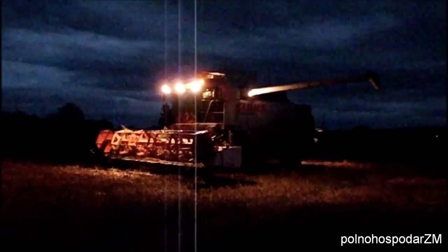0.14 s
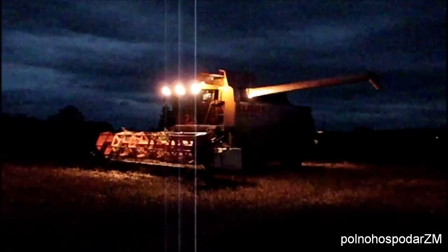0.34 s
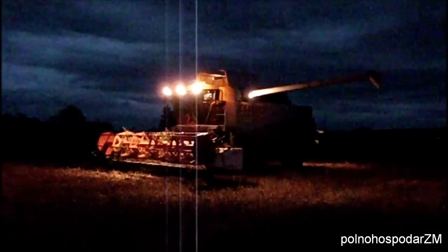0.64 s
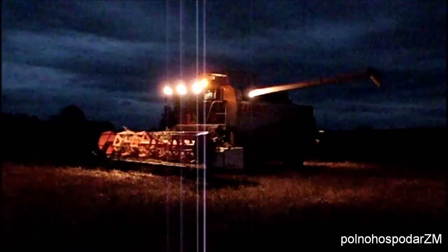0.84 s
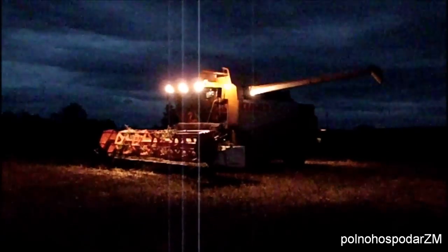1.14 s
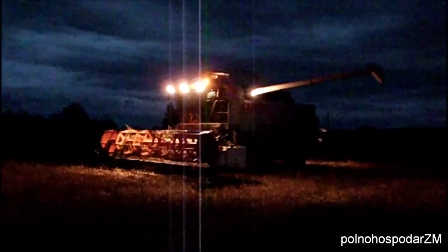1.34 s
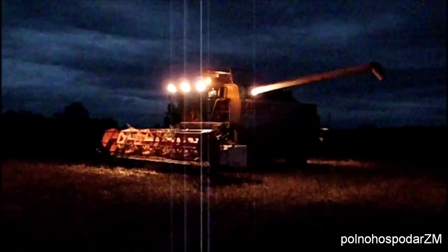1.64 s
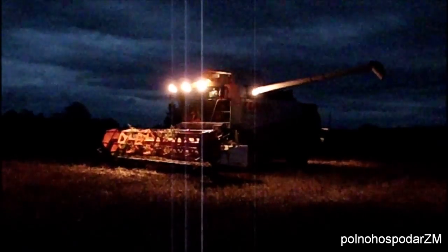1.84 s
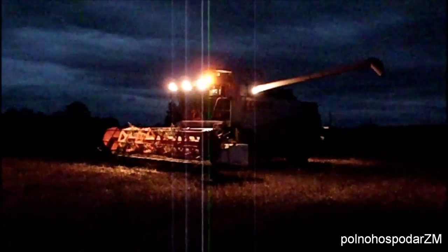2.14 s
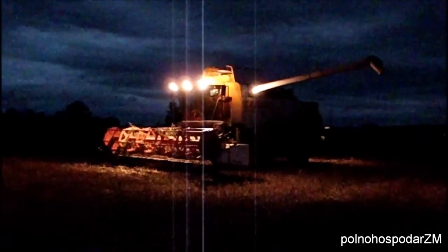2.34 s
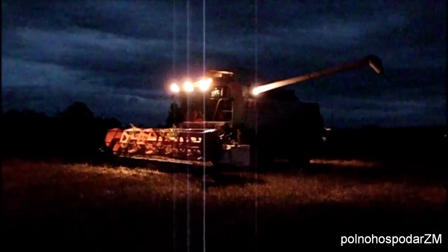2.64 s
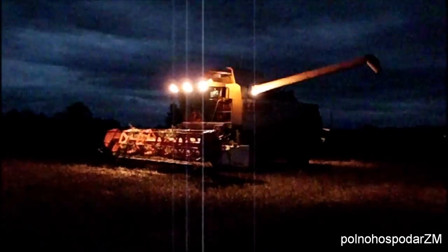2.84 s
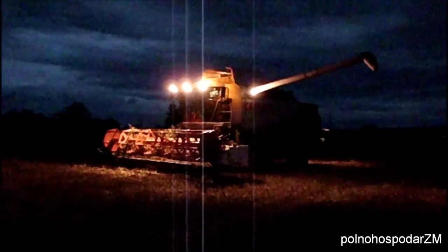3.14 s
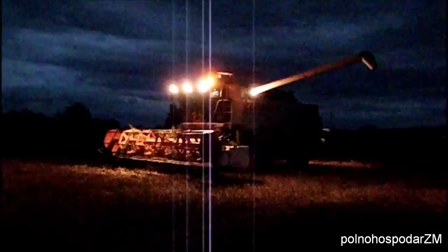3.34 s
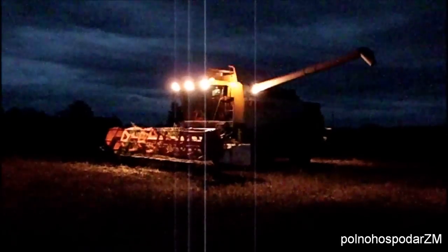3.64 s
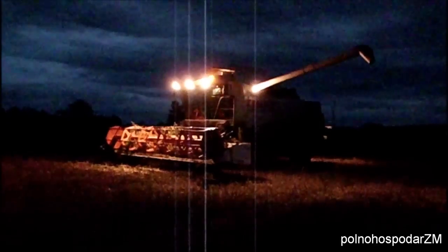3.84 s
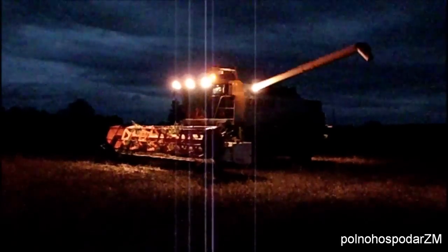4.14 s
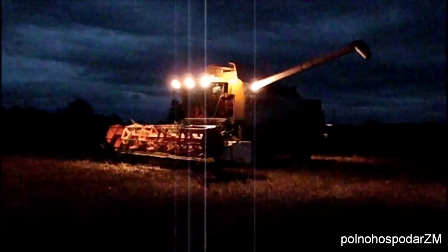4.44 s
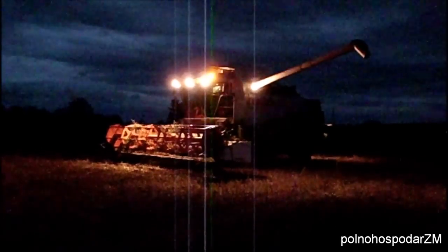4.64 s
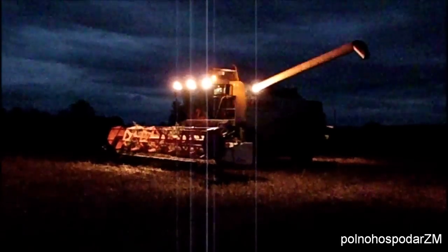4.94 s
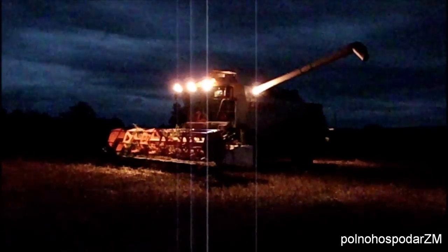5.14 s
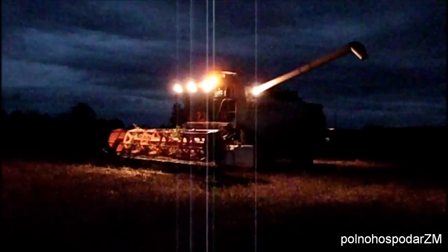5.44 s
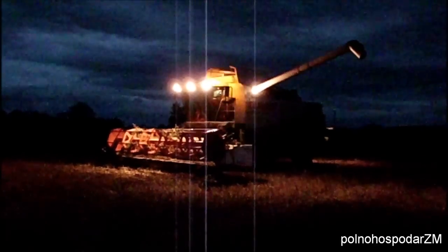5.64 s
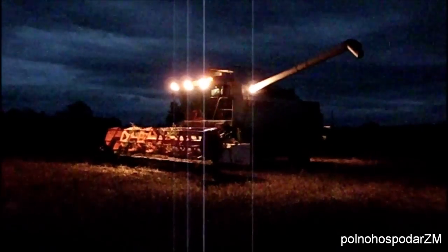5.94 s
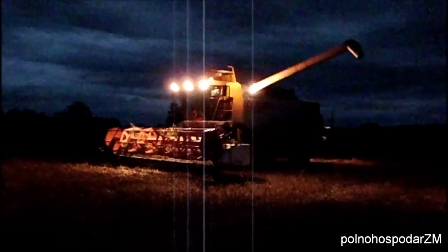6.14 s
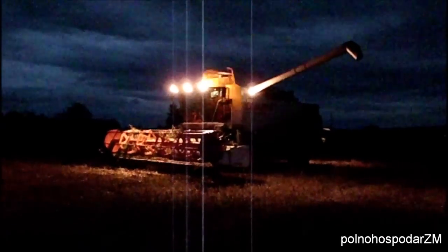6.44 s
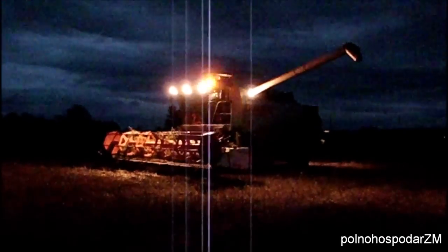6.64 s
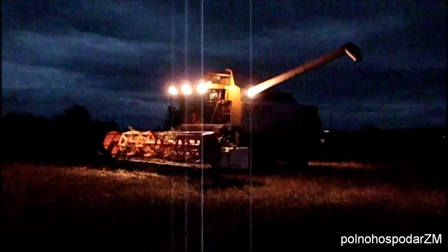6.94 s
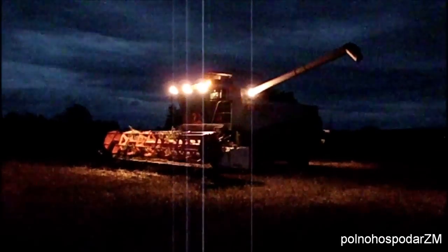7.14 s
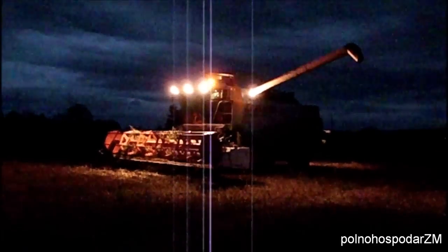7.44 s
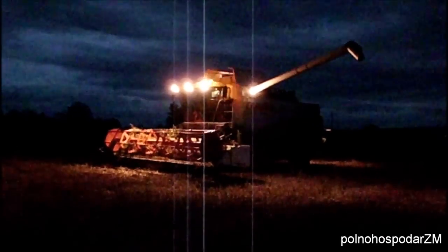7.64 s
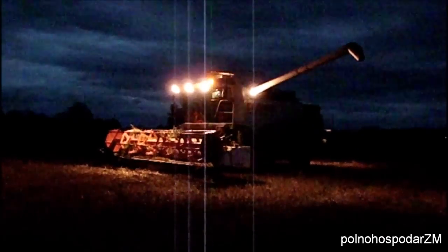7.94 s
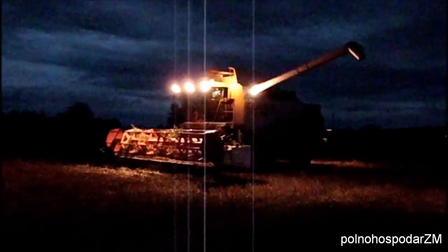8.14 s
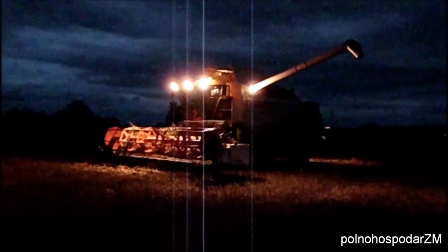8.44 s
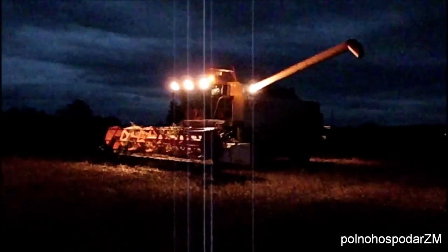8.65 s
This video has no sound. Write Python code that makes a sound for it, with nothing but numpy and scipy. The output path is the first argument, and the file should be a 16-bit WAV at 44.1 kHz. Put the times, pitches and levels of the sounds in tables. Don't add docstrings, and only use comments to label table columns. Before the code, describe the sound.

Across an open field at dusk, a combine harvester idles steadily some way off: low diesel hum, metallic ringing, wavering hydraulic whine, thin turbo whistle and a broad fan and exhaust rush. Slow wind rumbles come first, then after four seconds gusts rip and slap the small unshielded microphone, hardest near six. A tiny dry stalk snap comes near eight seconds, then a last gust.

```python
import sys
import numpy as np
from scipy import signal
from scipy.fft import rfft, irfft, next_fast_len
from scipy.io import wavfile
from scipy.ndimage import uniform_filter1d, map_coordinates

SR = 44100
rng = np.random.default_rng(int(sys.argv[2]) if len(sys.argv) > 2 else 0)


def ratio(d):
    e = np.asarray(d, float) / 20
    return 10 ** e


def int16_out(signal):
    q = np.round(np.clip(np.atleast_2d(signal).T, -1, 1) * 32767)
    wavfile.write(sys.argv[1], SR, q.astype(np.int16))


N = 387198
STEPS = np.arange(0, N + 64, 64)

# (time [s], speed [cycles/s])
ENGINE_SPEED = [(0, 9.989), (3, 9.989), (3.5, 9.992), (5.8, 9.992), (6.6, 9.998), (8.78, 9.998)]
ENGINE_ORDERS = [6, 58, 62, 63, 64, 65, 99, 102, 105, 108, 111, 116, 120, 123, 136, 138, 141, 200, 283]
ENGINE_ORDER_LEVELS = [-39.5, -64, -70, -70, -66.5, -70, -63.5, -70.5, -73, -67.5, -68.5, -65.5, -75, -70,
                       -68.5, -80, -66.5, -62.5, -75.5]
# (frequency [Hz], level [dB per Hz])
BLOCK_RING = [(500, -42), (850, -4.5), (1100, -3), (1400, -2.5), (1700, -2.5), (2500, -2.5), (3000, -11),
              (3600, -3), (4200, -12), (5000, -37)]
# (time [s], level [dB rms])
LOOSE_PANEL = [(0, -67), (.66, -66.5), (1.65, -59), (2.6, -59.5), (3, -63), (3.6, -59.5), (5.6, -63),
               (6.6, -56.5), (8.78, -57)]
# (frequency [Hz], level [dB per Hz])
PANEL_RATTLE = [(940, -28), (1010, -3), (1045, -4), (1090, -2), (1160, -32)]

# (time [s], whine level [dB rms], lean [dB])
PUMP_LOAD = [(0, -49.5, 1), (.4, -50, 2.5), (.99, -52, -4.5), (1.65, -51, -2), (1.98, -57, -8),
             (2.64, -53.5, -2), (2.97, -50, -1), (3.3, -51, 0), (3.7, -47.5, -1.5), (4.1, -47.5, 1),
             (4.29, -55, 7), (4.95, -53, 5.5), (5.3, -51.5, 2), (5.7, -51, 5), (6.27, -51.5, 1.5),
             (6.6, -56.5, -7), (7.26, -57, -2), (8.6, -53, 2)]
# (harmonic number, level over the whine [dB], share of load swing followed,
# share of lean followed, own drift [dB])
PUMP_STRONG_TONES = [(10, 0, 0.98, 0, .3), (11, -5, 1, 0.99, .6), (9, -3.5, .2, .15, 1.2),
                     (8, -7, .1, -.1, 1.7), (13, -9.5, .3, -0.3, 1.5), (14, -9, .5, .2, 2)]
# (harmonic number, level [dB rms])
PUMP_WEAK_TONES = [(2, -65), (3, -65.5), (4, -67), (6, -66.5), (12, -63.5), (15, -71)]

# (time [s], pitch [Hz], level [dB rms])
TURBO_WHISTLE = [(0.0, 4280, -60), (0.07, 4271, -62), (1.64, 4290, -64), (1.71, 4240, -70),
                 (3.59, 4272, -63.5), (5.55, 4270, -63), (6.02, 4280, -56.5), (6.26, 4260, -70),
                 (8.78, 4277, -58.5)]
# (pitch [Hz], level [dB])
ALTERNATOR = [(7975, -78), (9040, -80), (9570, -83)]

# (time [s], level [dB], brightness [dB])
RUSH_CARRIED = [(0, -48.5, 1), (.9, -49.5, .5), (1.6, -49.5, -.5), (2, -51, .5), (2.6, -50.5, 1),
                (2.96, -48, -1.5), (3.2, -50, .5), (3.45, -47, 0), (4.18, -48, -.5), (4.7, -48.5, -.5),
                (5.2, -46, 0), (5.7, -48, 0), (6.28, -48, -.5), (6.68, -50.5, .5), (7.1, -50, 0),
                (7.8, -50.5, .5), (8.4, -48.5, .5), (8.78, -50.5, 1)]
# (time [s], change [dB], half width [s])
AIR_POCKETS = [(.32, 1.5, 0.19), (2.17, -2.5, .1), (2.35, 1.5, .08), (2.59, -2.5, .12), (3.06, 0.5, .04),
               (3.15, -3, .05), (3.23, 2, .05), (3.79, 3, .06), (4.45, 1.5, .1), (4.7, -1, .05),
               (5.01, 3, 0.12), (5.31, 2.5, .05), (5.43, -1, .06), (5.57, 1, .06), (6.21, -1.5, .05),
               (6.89, 1.5, .1), (7.24, 1.5, .1), (7.58, -2.5, .06), (7.85, -2.5, .05), (8.05, 1, .06),
               (8.21, -2.5, .06), (8.31, 2, .08)]
# (frequency [Hz], level [dB per Hz])
RUSH_GROWL = [(150, -22), (300, 0), (640, 0), (780, -5), (900, -2.5), (1040, -1.5), (1200, -3.5),
              (1600, -5.5), (2200, -37)]
RUSH_BODY = [(1100, -19), (1700, -4), (2300, -2.5), (3200, -3), (4200, -2), (4800, -8.5), (5600, -20.5)]
RUSH_HISS = [(4000, -14), (5200, -7), (6300, 0), (7200, -1.5), (8200, 0.5), (9000, -4.5), (10000, -11),
             (12000, -20), (14200, -25.5), (14500, -30)]

# (frequency [Hz], level [dB per Hz])
WIND_RUMBLE = [(2, -10), (12, 1), (30, -1), (60, -7.5), (90, -19.5), (150, -46)]
WIND_BUFFET = [(35, -37), (70, 0), (120, -0.5), (180, -6), (300, -38.5)]
WIND_FLUTTER = [(100, -28), (180, 1), (280, -2), (400, -16.5), (600, -61)]
WIND_RIP = [(250, -6), (400, 2.5), (600, -3), (900, -12), (1500, -25.5), (2500, -50)]
# (time [s], strength [dB])
STEADY_BREEZE = [(0, -38.5), (.5, -41.5), (1.4, -43.5), (1.75, -42), (2.2, -37.5), (2.6, -39), (3.1, -41),
                 (3.6, -36), (4.25, -39.5), (4.8, -37), (5.5, -32), (5.75, -31.5), (5.9, -38),
                 (6.25, -30.5), (6.7, -36), (7, -42), (8.15, -40), (8.5, -45.5)]
# (size [octaves above the largest], level over breeze [dB], growth relative to breeze)
EDDY_SIZES = [
    (0, 8, 0.89),
    (2, .5, 1),
    (3, -6, 1.1),
    (4, -17, 0.75),
]
# (time [s], peak [dB], time to fall 10 dB [s], eddy size [octaves above the largest])
WIND_HEAVES = [(.66, -27, .1, 0.71), (.78, -21.5, 0.08, .3), (.89, -24.5, .04, .8),
               (1.05, -36.5, .06, 2.16), (1.76, -21.5, 0.03, .4), (2.98, -24.5, 0.02, .8),
               (3.22, -24, .08, .5), (3.55, -24.5, .15, 0.89), (3.99, -19.5, 0.1, 1.1),
               (4.43, -24.5, .1, 1.1), (4.6, -23, .05, 1), (4.8, -23, 0.16, .5), (4.96, -22, 0.1, .2),
               (5.62, -20.5, .05, 1.7), (5.43, -16.5, .07, .3), (5.79, -23, 0.02, 1.6),
               (5.97, -23, .05, .2), (6.07, -22, 0.1, 1.2), (6.16, -18.5, 0.03, 1.4), (6.36, -20, 0.1, 1),
               (6.58, -22, 0.2, 1), (6.89, -23.5, .1, .6), (7.13, -19.5, .1, 1), (7.51, -26, 0.07, 0.75),
               (8.25, -23.5, .06, .4), (8.36, -24.5, 0.04, 0.89), (8.64, -17, .065, 0.77)]
# (time [s], peak [dB], time to fall 10 dB [s], eddy size [octaves above the largest])
WIND_GUSTS = [(0, -37, 0.2, 2.66), (1.88, -30, 0.08, 1.9), (2.17, -29, 0.17, 2.27),
              (2.68, -32.5, 0.1, 2.26), (3.3, -38, .12, 2.95), (3.45, -38, .08, 2.9),
              (3.74, -26, .07, 2.15), (4.2, -28, 0, 2.6), (4.6, -25, 0.02, 1.8), (4.65, -25.5, 0.0329, 3.9),
              (4.72, -33, .08, 2.9), (5.06, -27, .05, 2.7), (5.22, -30, 0.06, 2.8), (5.36, -32, .07, 3),
              (5.52, -30, .06, 3.1), (5.62, -23.5, 0.05, 3.9), (5.75, -27.5, 0.06, 3.13),
              (6.08, -24, .04, 2.8), (6.15, -27, 0.03, 3.83), (6.35, -24, 0.054, 3.1),
              (6.44, -26, 0.08, 2.24), (6.7, -35, .025, 3.3), (6.79, -29, 0.04, 3.34),
              (7.12, -28, 0.03, 4.05), (7.24, -32.5, 0.06, 2.54), (8.05, -36.5, 0.14, 2.15),
              (8.68, -28.5, .03, 2.3), (8.78, -26.5, .03, 2.8)]
# (time [s], peak pressure, half width [ms])
EDDY_SLAPS = [(4.2006, -0.35, 1.05), (4.628, 0.13, 0.39), (4.637, -.22, .55), (4.641, -0.22, .86),
              (4.6507, -0.32, 1.1), (4.66, 0.28, .6), (5.588, -.31, .59), (5.611, .2, .45),
              (5.632, .48, 1.9), (5.6352, -.19, .24), (5.6428, .2, .55), (5.749, .14, .3),
              (6.138, 0.21, .91), (6.145, -0.22, .9), (6.155, .37, 1.2), (6.3296, -.26, .8),
              (6.3461, 0.28, .55), (6.347, -0.35, .65), (6.3566, -.44, 1.7), (6.359, -0.21, 0.23),
              (6.3617, .22, .54), (6.448, -0.31, 0.96), (6.783, -.16, 1.8), (6.792, .23, 1.3),
              (7.0914, 0.25, .6), (7.1127, 0.38, 0.34), (7.115, -0.15, 0.56), (7.118, -0.38, 0.4),
              (8.7596, -.22, 1.4), (8.766, 0.2, 0.74)]
# (time [s], peak [dB])
STALK_SNAPS = [
    (7.9535, -41.5),
    (7.9573, -29),
]


def engine(cycles):
    tones = sum(tone(order * cycles, db, 1.3) for order, db in zip(ENGINE_ORDERS, ENGINE_ORDER_LEVELS))
    panel_db = curves(LOOSE_PANEL)[0]
    panel_hum = tone(104 * cycles, panel_db + 1, 0.6)
    panel_rattle = ratio(panel_db - 4 + 1.5 * wobble(30)) * noise(PANEL_RATTLE, 1.2)
    size = SR // 10
    repeated = np.tile(rng.standard_normal(size), 4)
    clatter = coloured(repeated, BLOCK_RING)[size:2 * size]
    ring = map_coordinates(clatter, [cycles % 1 * size], mode="grid-wrap")
    return tones + panel_hum + panel_rattle + ratio(-53 + 0.95 * wobble(3.01)) * ring


def pump(cycles):
    turn = 217.5 / 9.992 * cycles
    whine_db, lean_db = curves(PUMP_LOAD)
    mean_db = whine_db.mean()
    load_swing_db = whine_db - mean_db
    strong = 0
    for harmonic, db, follows, leans, drift_db in PUMP_STRONG_TONES:
        level_db = mean_db + db + follows * load_swing_db + leans * lean_db
        level_db = level_db + drift_db * wobble(2.505)
        strong = strong + tone(harmonic * turn, level_db, 1.3, scatter=0.24)
    weak = sum(tone(harmonic * turn, db, 2.6) for harmonic, db in PUMP_WEAK_TONES)
    return strong + weak


def whistles():
    hz, db = curves(TURBO_WHISTLE)
    turbo_cycles = np.cumsum(hz + 4 * wobble(12)) / SR
    turbo = tone(turbo_cycles, db, 2.4)
    alternator = sum(tone(pitch * np.arange(N) / SR, level, 2.5) for pitch, level in ALTERNATOR)
    return turbo + alternator


def rush(cycles):
    carried_db, bright_db = curves(RUSH_CARRIED)
    pockets = sum(db * np.exp(-((STEPS / SR - s) / width) ** 2) for s, db, width in AIR_POCKETS)
    pocket_db = spread(pockets)
    hiss_share = 0.43
    carried_db = carried_db + (1 - hiss_share) * pocket_db
    mean_db = carried_db.mean()
    growl_db = mean_db - 0.5 + 0.9 * (carried_db - mean_db) - bright_db
    body_db = carried_db + 1
    hiss_db = carried_db - 1.5 + bright_db + hiss_share * pocket_db
    firing = 2 * np.pi * 6 * cycles
    throb_db = 0.4 * np.cos(firing) + 0.25 * np.cos(2 * firing) + 0.25 * np.cos(firing / 2)
    growl = ratio(growl_db + 0.37 * wobble(20)) * noise(RUSH_GROWL, 1.06)
    body = ratio(body_db + throb_db + 0.65 * wobble(9)) * noise(RUSH_BODY, 0.93)
    hiss = ratio(hiss_db + throb_db / 2 + 0.57 * wobble(12)) * noise(RUSH_HISS, 0.72)
    return growl + body + hiss


def wind():
    rumble_db, buffet_db, flutter_db, rip_db = eddy_levels()
    lump, jab = wobble(25), wobble(70)
    fierce = np.clip((rip_db + 54) / 16, 0.3, 1)
    rumble = unit(ratio(1.44 * wobble(12) + 0.77 * lump) * noise(WIND_RUMBLE, 0.95))
    buffet = unit(ratio(1.5 * lump) * noise(WIND_BUFFET, 0.97))
    flutter = unit(ratio(fierce * (2.5 * lump + 1.7 * jab)) * noise(WIND_FLUTTER, 0.98))
    rip = unit(ratio(fierce * (3.3 * lump + 3.7 * jab)) * noise(WIND_RIP, 1.2))
    large = ratio(rumble_db) * rumble + ratio(buffet_db) * buffet
    return large + ratio(flutter_db - 1.3 * fierce) * flutter + ratio(rip_db - 2.3 * fierce) * rip


def eddy_levels():
    t = STEPS / SR
    strength_db = np.interp(t, *np.transpose(STEADY_BREEZE))
    mean_db = strength_db.mean()
    octave, over_db, grows = np.transpose(EDDY_SIZES)[..., None]
    power = ratio(2 * (mean_db + over_db + grows * (strength_db - mean_db)))
    for s, db, fall_s, size in WIND_HEAVES + WIND_GUSTS:
        reach_db = db - 10 * np.maximum(octave - size, 0) - 0.5 * np.maximum(size - octave, 0)
        power = power + ratio(2 * reach_db) * ratio(-20 * np.abs(t - s) / fall_s)
    return [spread(10 * np.log10(p)) for p in power]


def slaps():
    x, t = np.zeros(N + SR), np.arange(-800, 800) / SR
    for s, pressure, ms in EDDY_SLAPS:
        spike = np.hanning(len(t)) / (1 + (1000 * t / ms) ** 2)
        x[round(s * SR) - 800:][:len(t)] += pressure * spike
    return x[:N]


def stalk_snaps():
    x, t = np.zeros(N), np.arange(80) / SR
    click = np.sin(2 * np.pi * 9500 * t) * np.exp(-((t - 0.0006) / 0.00022) ** 2)
    for s, db in STALK_SNAPS:
        x[round(s * SR):][:len(t)] += ratio(db) * click
    return x


def tone(cycles, db, fade_db, scatter=1):
    shimmer = ratio(db) * spread(ratio(fade_db * (drift(5) + 0.66 * drift(18))))
    phase = cycles + scatter * rng.random() + 0.032 * wobble(8)
    return np.sqrt(2) * shimmer * np.sin(2 * np.pi * phase)


def noise(points, patchy_db):
    z = signal.stft(rng.standard_normal(N), nperseg=512)[2]
    field = uniform_filter1d(rng.standard_normal(z.shape), size=8, axis=0)
    field = uniform_filter1d(field, size=12, axis=1)
    patchy = signal.istft(z * ratio(patchy_db * unit(field)), nperseg=512)[1][:N]
    return coloured(patchy, points)


def coloured(x, points):
    m = next_fast_len(len(x))
    f, db = np.transpose(points)
    log_hz = np.log(np.fft.rfftfreq(m, 1 / SR) + 1)
    gain = ratio(np.interp(log_hz, np.log(f + 1), db, -120, -120))
    return unit(irfft(rfft(x, m) * gain, m)[:len(x)])


def unit(x):
    return x / np.sqrt(np.mean(x ** 2) + 1e-20)


def curves(rows):
    s, *cols = np.transpose(rows)
    return [np.interp(np.arange(N) / SR, s, c) for c in cols]


def wobble(rate):
    return spread(drift(rate))


def spread(control):
    return np.interp(np.arange(N), STEPS, control)


def drift(rate):
    knots = rng.standard_normal(int(N * rate / SR) + 4)
    return map_coordinates(knots, [STEPS * rate / SR])


def scene():
    cycles = np.cumsum(curves(ENGINE_SPEED)[0]) / SR
    machine = engine(cycles) + pump(cycles) + whistles() + rush(cycles)
    return (machine + wind() + slaps() + stalk_snaps())[None]


def low_pass(x):
    return signal.sosfilt(signal.butter(12, 14460, fs=SR, output="sos"), x)


def record(dry):
    mix = dry + 0.01
    return low_pass(mix)


dry = scene()
out = record(dry)
int16_out(out)
```